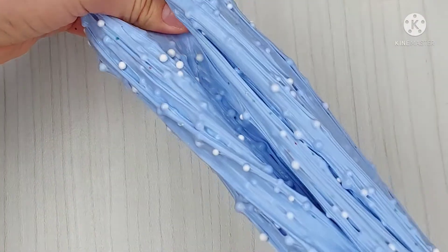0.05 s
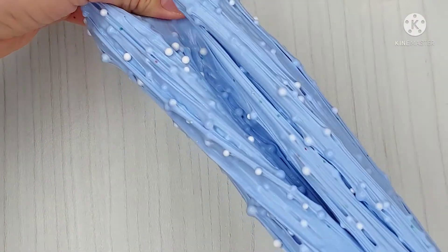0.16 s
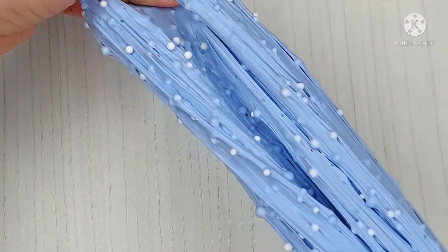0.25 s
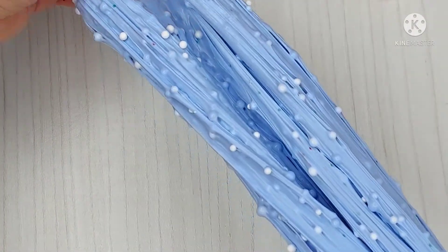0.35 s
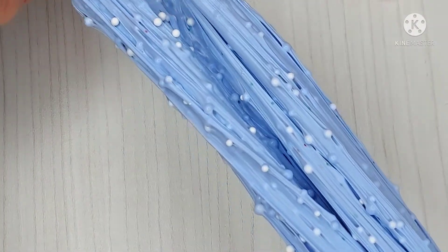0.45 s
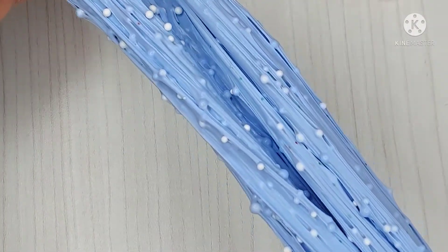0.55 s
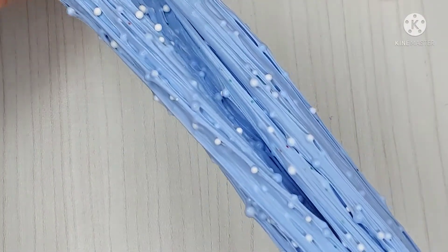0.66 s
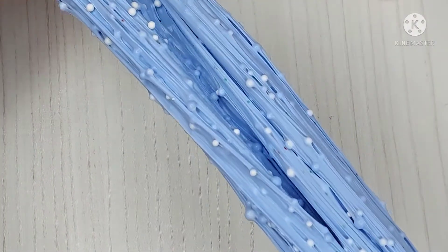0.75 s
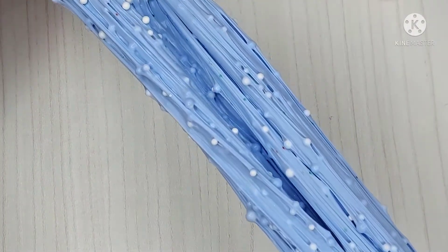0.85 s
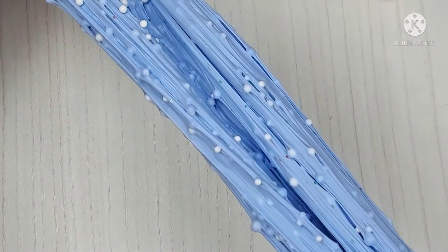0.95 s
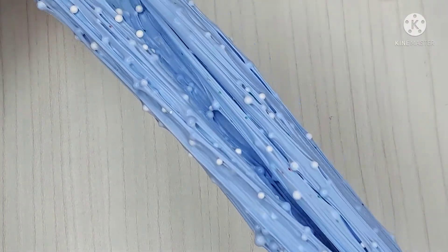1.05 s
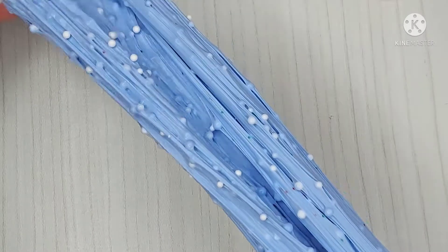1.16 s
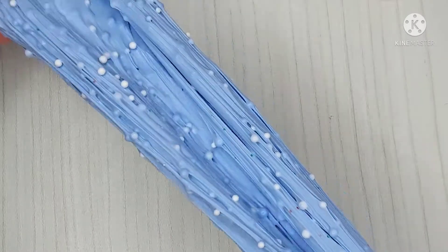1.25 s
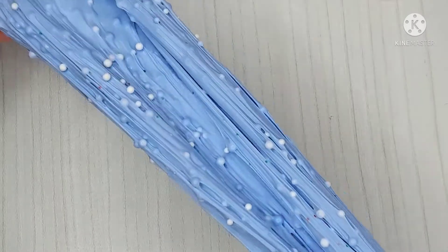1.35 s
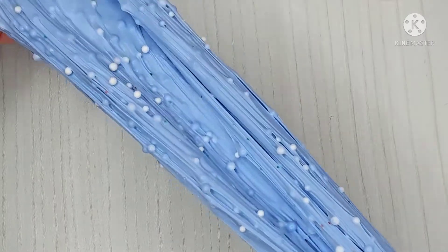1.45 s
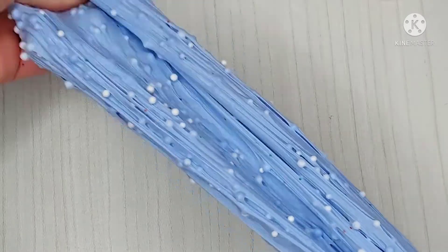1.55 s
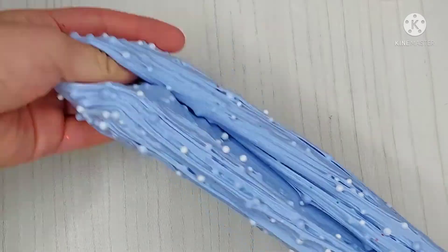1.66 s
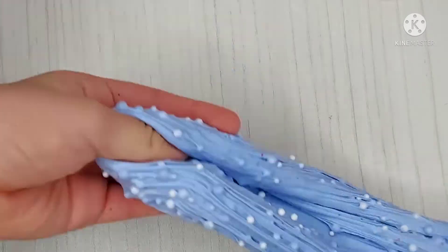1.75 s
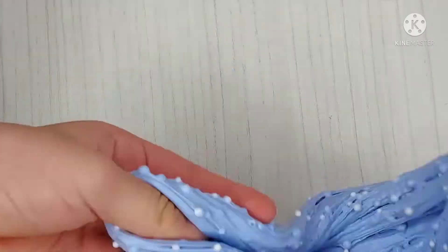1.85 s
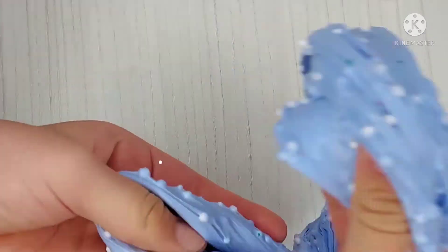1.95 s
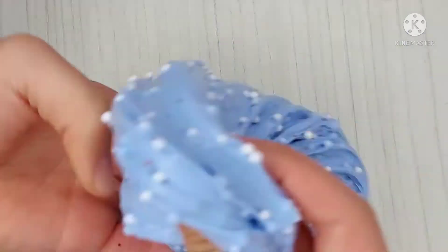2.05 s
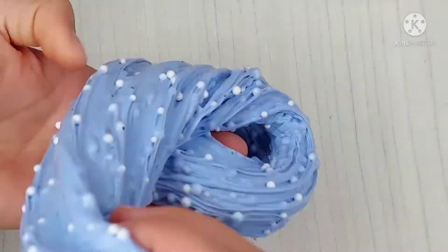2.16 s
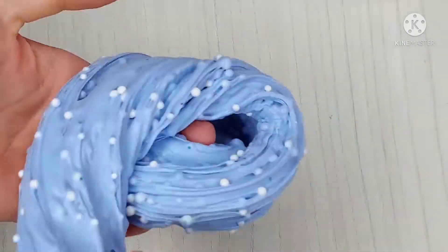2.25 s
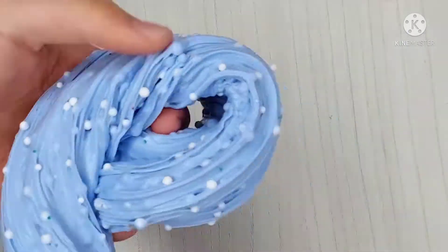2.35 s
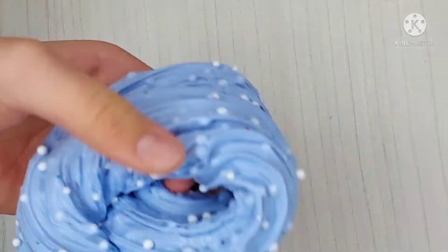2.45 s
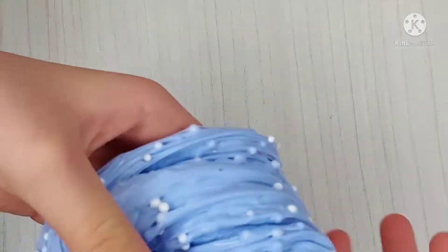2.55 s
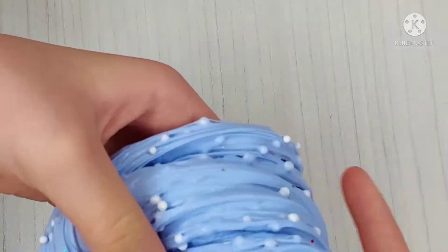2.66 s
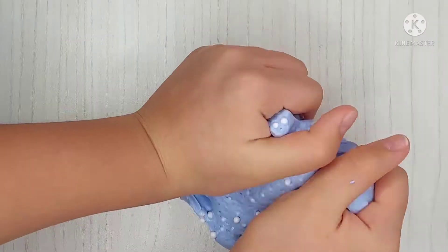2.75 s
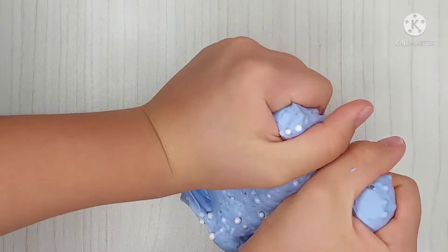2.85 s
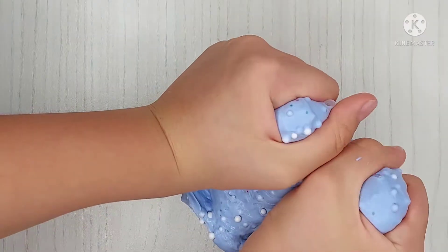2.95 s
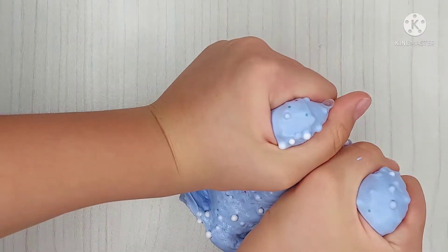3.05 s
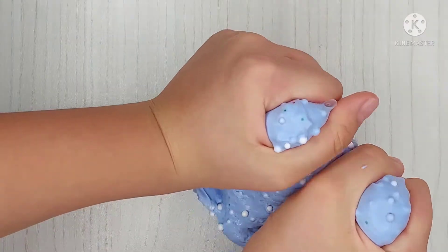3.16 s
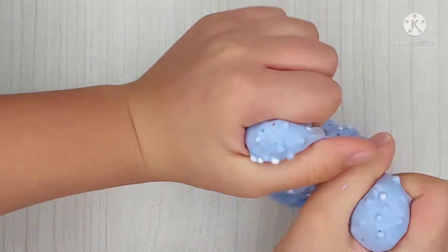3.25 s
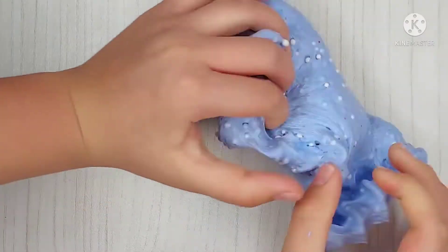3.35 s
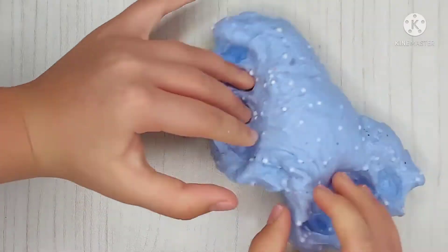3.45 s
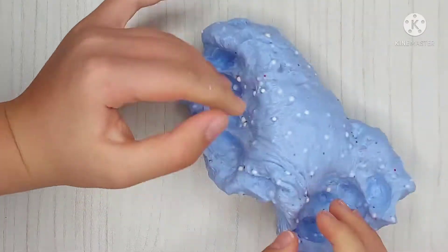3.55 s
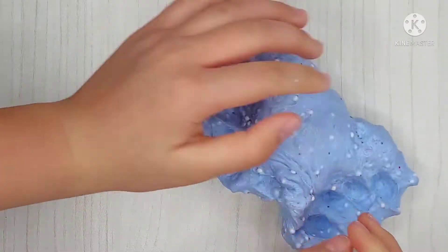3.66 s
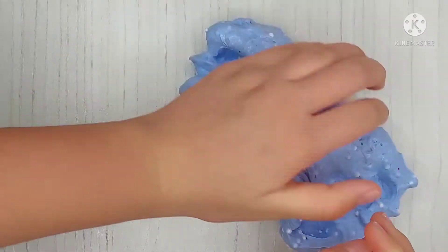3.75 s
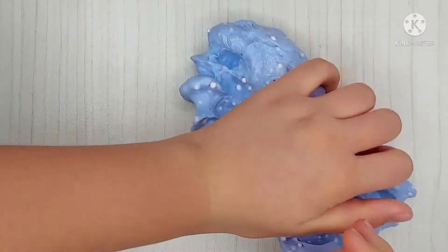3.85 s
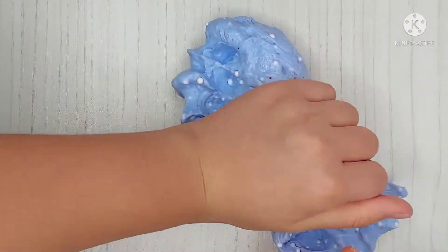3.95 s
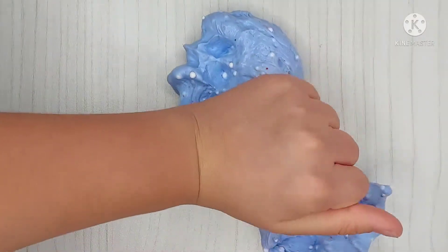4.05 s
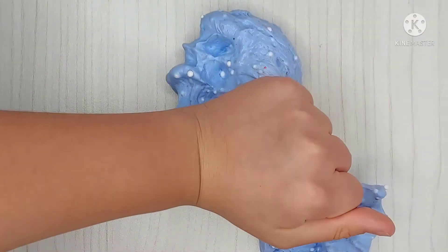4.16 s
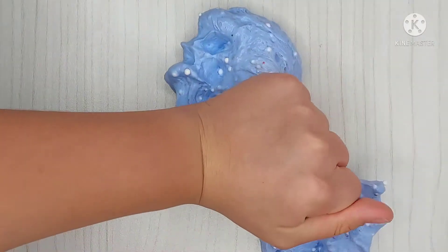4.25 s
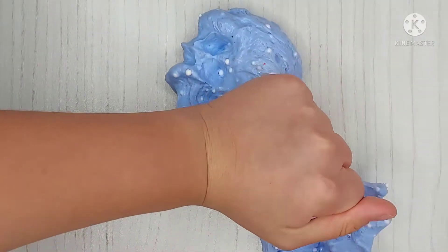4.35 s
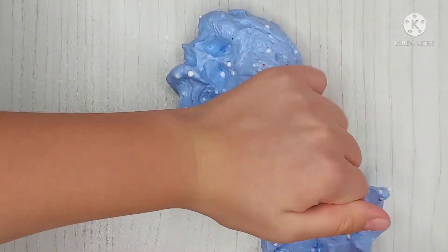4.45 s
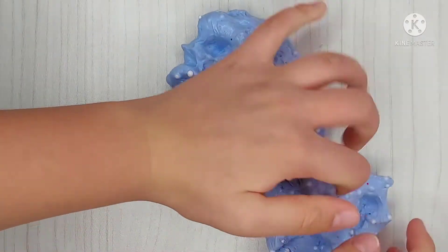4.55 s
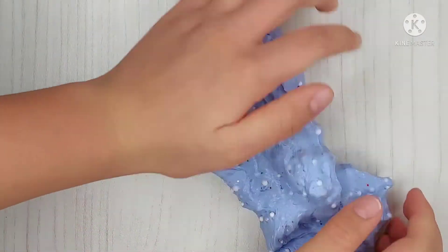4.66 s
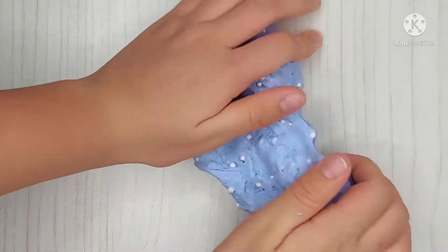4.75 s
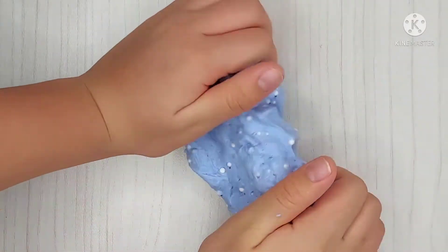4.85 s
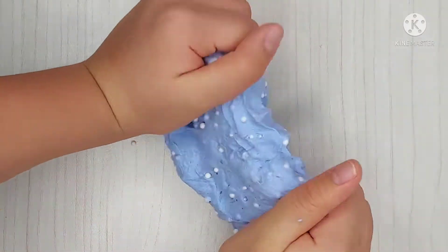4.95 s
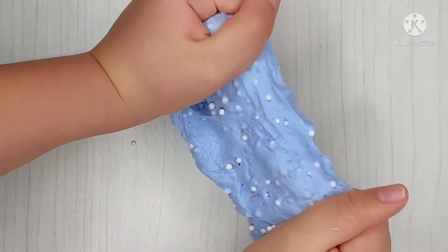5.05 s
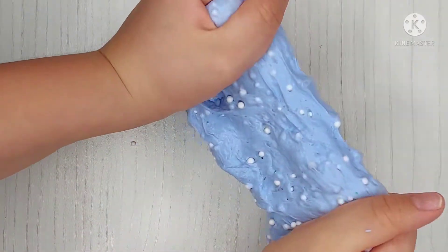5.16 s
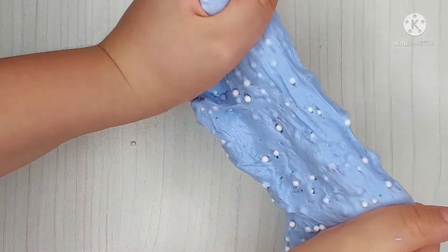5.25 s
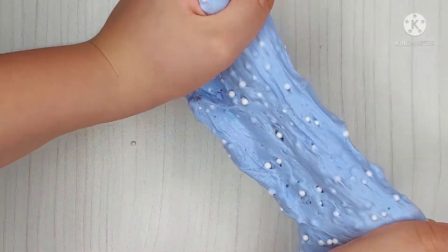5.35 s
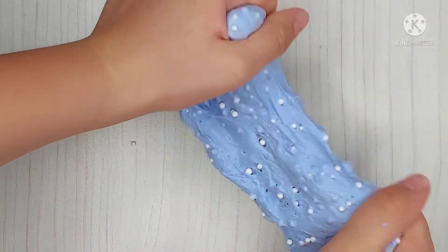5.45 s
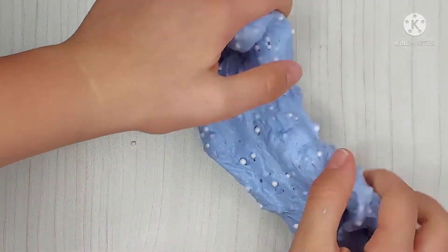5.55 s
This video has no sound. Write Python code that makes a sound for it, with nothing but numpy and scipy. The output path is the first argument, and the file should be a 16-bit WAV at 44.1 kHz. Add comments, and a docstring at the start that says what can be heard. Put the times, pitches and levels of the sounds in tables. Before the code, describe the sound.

A quiet room with a barely audible low hum; the microphone is very close. From 0 to 1 s, stretching slime gives small, irregular dry ticks over a faint sticky fizz, thinning out until about 2 s. Folding adds soft wet peels and a couple of clearer clicks near 2.5 s. At about 2.9 s a squeeze bursts air pockets in a dense, very loud volley of sharp snaps, crunching until roughly 3.16 s. Fewer, weaker pops and a sticky fizz follow around 3.3 to 3.6 s, with soft hand bumps on the table. It is nearly silent until 3.9 s. Pressing builds from 4.1 s into a second loud crunch at 4.2 to 4.45 s, mixing deep, hollow pops and bright snaps. Small crackles fade, and a dull table thump lands at 4.8 s. From 5.05 to 5.4 s a third, crisp, rapid burst crunches, then drops to light, sticky crackle by 5.5 s.

```python
"""Squeezing airy slime on a tabletop

Hands stretch, then squeeze slime full of air pockets and foam beads, heard from close by.
Pockets burst as sharp filtered clicks that bounce off the table and end in a noisy sputter.
Wet skin makes a sticky fizz of tiny decaying tones over hiss; hands bump and drag on the table, which
rings as a set of fading sines. A quiet room adds its echo, and shaped noise hums underneath."""
import sys
import numpy as np
from scipy import signal
from scipy.fft import rfft, irfft
from scipy.io import wavfile
from scipy.ndimage import uniform_filter1d

SR = 44100
rng = np.random.default_rng(int(sys.argv[2]) if len(sys.argv) > 2 else 0)


def transcribe(u):
    """Save the signal u as a 16-bit wav file named by the first command-line argument.

    u: samples, shape (n,) or (channels, n), limited to [-1, 1]; the rate is SR.
    q: integer samples, one column per channel.
    """
    v = np.clip(np.atleast_2d(u).T, -1, 1)
    q = np.round(v * 32767).astype(np.int16)
    wavfile.write(sys.argv[1], SR, q)


N = 246519  # length in samples


def gain_of(db):
    """Turn decibels into a plain multiplier."""
    return 10 ** (np.asarray(db) / 20)


def evened(x):
    """Scale a sound to an average (RMS) level of one."""
    return x / np.sqrt(np.mean(x ** 2, -1, keepdims=True) + 1e-20)


def read(points, hz):
    """Read a curve of (f/Hz, value) points, with pitch spaced by ratio as the ear hears it."""
    f, value = np.transpose(points)
    return np.interp(np.log(hz + 1), np.log(f + 1), value)


def add(mix, s, sound):
    """Mix a sound in at s seconds, cutting it off at the end of the mix."""
    part = mix[round(s * SR):][:len(sound)]
    part += sound[:len(part)]


def swell(start, hold, first_db, last_db, rise, fall):
    """Gain of one gesture: rises, slides between two levels while held, falls; slopes in dB a second."""
    t = np.arange(N) / SR - start
    held_db = np.interp(t, [0, hold], [first_db, last_db])
    return gain_of(held_db + rise * np.minimum(t, 0) - fall * np.maximum(t - hold, 0))


def shaped_noise(db, size, patchy_db):
    """Noise from random short-time spectra under a dB field (pitch x time), with drifting patches."""
    a, b, patches = rng.standard_normal((db.shape[1], db.shape[0], 3)).T
    patches = uniform_filter1d(uniform_filter1d(patches, 5, 0), 6, 1)
    spectra = (a + 1j * b) * gain_of(db + patchy_db * patches / patches.std())
    return signal.istft(spectra, nperseg=size, noverlap=size * 3 // 4)[1][:N]


# Colour of the background noise: (f/Hz, relative level/dB per Hz)
HUM_COLOUR = [(12, -55.5), (20, -23), (65, -5.5), (114, -10), (174, -20.5), (218, -23), (251, -22.5),
              (440, -28), (492, -36), (551, -36), (888, -42), (12800, -47), (16500, -65)]
# A low hum comes and goes: (start t/s, hold t/s, level/dB)
DRONE = [(1.067, 0.19, -68.5), (2.416, 0.19, -69), (5.41, 0.11, -65)]
HUM_DB = -66
DRONE_HZ, DRONE_FADE_DB_PER_S = 121, 239.5


def hum():
    """Noise makes the low rumble of the house and faint microphone hiss; a sine makes the passing hum."""
    hz, t = np.fft.rfftfreq(2048, 1 / SR), np.arange(N) / SR
    colour = read(HUM_COLOUR, hz)[:, None] * np.ones(N // 512 + 5)
    rumble = shaped_noise(colour, size=2048, patchy_db=0.0)
    drone_level = sum(swell(s, hold, db, db, DRONE_FADE_DB_PER_S, DRONE_FADE_DB_PER_S)
                      for s, hold, db in DRONE)
    drone = drone_level * np.sin(2 * np.pi * DRONE_HZ * t)
    return gain_of(HUM_DB) * evened(rumble) + drone


# The faint crackle of slime under tension: (t/s, level/dB)
STRETCH = [(0, -74), (.5, -74), (1, -77), (1.25, -76.5), (1.5, -80.5), (1.9, -73), (2.25, -74.5),
           (2.6, -76.5), (2.83, -73.5), (3.65, -71), (3.72, -94), (3.85, -78.5), (4.049, -70), (4.62, -76),
           (4.69, -90), (4.82, -70.5), (5.59, -74)]
STRETCH_DULL_DB = 3.5  # lift of its lows
# Wet skin presses in or peels off:
# (start t/s, hold t/s, fizz level at start/dB, fizz level at end/dB, lift of its lows/dB,
#  level of the drag on the table/dB)
PEELS = [(1.67, 0.21, -67.5, -78, -2, -100), (2.045, 0.019, -72.5, -65.5, 12.5, -100),
         (2.08, .015, -60, -61.5, -13, -100), (2.297, 0.011, -64, -64, -1.5, -100),
         (2.485, 0.043, -64.5, -71, -2, -100), (2.909, .19, -48.5, -63, 4.5, -93),
         (3.266, 0.17, -49, -51, -0.5, -67.5), (3.474, 0.032, -65, -69, 7.5, -100),
         (3.528, 0.065, -62.5, -69.5, 2.5, -78), (3.949, 0.076, -61.5, -68, 0.5, -98),
         (4.098, .03, -63.5, -59, 7.5, -67), (4.202, 0.19, -53.5, -55.5, 5.5, -81),
         (4.298, 0.037, -51, -43.5, -15, -100), (4.528, 0.11, -48.5, -57, 1.5, -63.5),
         (4.912, 0.2, -55.5, -58.5, 6.5, -67), (5.168, 0.16, -56, -60, 4.5, -93.5),
         (5.348, 0.063, -47, -58.5, -1.5, -77), (5.529, 0.05, -55.5, -51, -0.5, -77)]
RISE_DB_PER_S, FALL_DB_PER_S = 401, 599.5


def wetness():
    """Level of the fizz, whole and in its lows: the stretch and every peel add up in power."""
    parts = [gain_of(np.interp(np.arange(N) / SR, *np.transpose(STRETCH)))]
    parts += [swell(*row[:4], RISE_DB_PER_S, FALL_DB_PER_S) for row in PEELS]
    dull = gain_of([STRETCH_DULL_DB] + [row[4] for row in PEELS])[:, None]
    return np.linalg.norm(parts, axis=0), np.linalg.norm(parts * dull, axis=0)


# Colour of the fizz: (f/Hz, relative level/dB per Hz)
FIZZ_COLOUR = [(250, -16), (500, -2.5), (1000, 1), (2000, -1.5), (4000, -0.5), (7000, -2.5), (11000, -6),
               (14000, -15), (16000, -20.5)]


def fizz(level, lows_level):
    """Countless tiny threads and bubbles snap: clumped grains of many pitches over a lumpy hiss."""
    grains = np.zeros(N)
    snaps = rng.random(N) < 1800 / SR  # about 1800 a second
    size = gain_of(2.23 * np.minimum(rng.exponential(1, N), 5)) * snaps
    kinds = np.geomspace(500, 15000, num=24)  # grain pitches in Hz
    kind, t = rng.integers(0, len(kinds), N), np.arange(400) / SR
    for k, hz in enumerate(kinds):
        grain = np.sin(2 * np.pi * hz * t) * np.exp(-t * hz / 5.5)
        grain *= gain_of(read(FIZZ_COLOUR, hz)) * np.sqrt(hz) / np.linalg.norm(grain)
        grains += signal.oaconvolve(size * (kind == k), grain)[:N]
    hz = np.fft.rfftfreq(256, 1 / SR)
    colour = read(FIZZ_COLOUR, hz)[:, None] * np.ones(N // 64 + 5)
    hiss = shaped_noise(colour, size=256, patchy_db=4.0)
    # threads let go in bunches, so the level wanders
    clumps = evened(uniform_filter1d(uniform_filter1d(rng.standard_normal(N), 300), 300))
    both = evened((0.72 * evened(grains) + 0.66 * evened(hiss)) * gain_of(2.2 * clumps))
    lows = signal.lfilter(*signal.butter(2, 3000, fs=SR), both)
    return level * (both - lows) + lows_level * lows


# Hands on the table: (t/s, peak level/dB, softness/ms)
BUMPS = [(2.979, -53, 1.6), (3.467, -45, 1.4), (3.52, -52, 1.9), (3.571, -53, 1.7), (3.909, -57.5, 1.25),
         (4.546, -49, 1.4), (4.6, -54, 0.8), (4.745, -51.5, 1.2), (4.794, -33, 0.56), (4.847, -53, 1.14),
         (4.935, -47, 1.1), (4.978, -47, 0.94)]
# Tones the tabletop rings at: (f/Hz, relative level/dB, time to fade by 60 dB/s)
TABLE_MODES = [(54, 2, .16), (81, -2, .13), (118, -7, .1), (226, -1, .12), (285, -3, .06), (400, -8, .04),
               (490, -3, .04), (715, -8, .03)]
DRAG_RISE_DB_PER_S, DRAG_FALL_DB_PER_S = 110.5, 91.5


def tabletop(slime):
    """Soft pushes, dragging and the slime's own sound ring the tabletop's low tones."""
    t, push = np.arange(SR // 4) / SR, np.zeros(N)
    # the board takes about a cycle to swing up
    ring = sum(gain_of(db - 60 * t / t60) * np.sin(2 * np.pi * hz * t) * np.tanh(1.3 * hz * t)
               for hz, db, t60 in TABLE_MODES)
    for s, db, soft in BUMPS:
        press = np.exp(-((1000 * t[:900] - 2 * soft) / soft) ** 2)
        blow = np.convolve(ring, press)
        add(push, s, -gain_of(db) * blow / abs(blow).max())
    rub = evened(signal.oaconvolve(np.diff(rng.standard_normal(N + 1)), ring)[:N])
    drag = rub * sum(swell(s, hold, db, db, DRAG_RISE_DB_PER_S, DRAG_FALL_DB_PER_S)
                     for s, hold, *_, db in PEELS)
    shaken = signal.oaconvolve(np.diff(slime, prepend=0), ring)[:N]
    return push + drag + gain_of(-14.5) * shaken


# How long the room's echo lasts: (f/Hz, time to fade by 60 dB/s)
ROOM_FADE = [(500, 0.2), (2000, 0.14), (6000, 0.15), (14000, 0.11)]


def room(x):
    """Room echo: sparse taps of random sign after 3 ms, each band dying at its own speed."""
    taps = np.zeros(SR // 4)
    at = np.arange(130, len(taps) - 20, 20)
    taps[at + rng.integers(0, 20, len(at))] = rng.choice([-1., 1.], len(at))
    hz, t, spectra = signal.stft(taps, SR, nperseg=256)
    fade = gain_of(-60 * t / read(ROOM_FADE, hz)[:, None])
    tail = signal.istft(spectra * fade, SR, nperseg=256)[1]
    return signal.fftconvolve(x, tail / np.linalg.norm(tail))[:N]


def causal(db):
    """Spectra that put the sound as early as it can be (minimum phase), from rows of gains in dB."""
    log_gain = np.log(gain_of(np.maximum(db, -100)))
    circle = np.concatenate([log_gain, log_gain[..., -2:0:-1]], -1)
    return np.exp(signal.hilbert(circle).conj()[..., :db.shape[-1]])


LOWS_DB, HIGHS_DB = -2.5, -2.225
LOWS_PER_DULL_DB, HIGHS_PER_DULL_DB = 0.4, -0.534  # dullness raises the lows and lowers the highs
# the higher a pocket's pitch, the more its own tone stands out
LOWS_DB_PER_OCTAVE, HIGHS_DB_PER_OCTAVE = -2.5, -3.115
BOUNCE_MS, BOUNCE_SPREAD_MS, BOUNCE_DB, BOUNCE_SPREAD_DB = 0.878, 0.11, -13, 2


def bursts(rows):
    """Each burst: a click, its bounce off the table, and a sputter as the pocket's walls collapse."""
    _, peak_db, pocket_hz, dull_db, sputter_db, tone_db = rows.T[:, :, None]
    octave = np.log2(pocket_hz / 4000)
    low_db = LOWS_DB + LOWS_PER_DULL_DB * dull_db + LOWS_DB_PER_OCTAVE * octave - tone_db
    high_db = HIGHS_DB + HIGHS_PER_DULL_DB * dull_db + HIGHS_DB_PER_OCTAVE * octave - 0.89 * tone_db
    # the bounce's delay and level vary at random from burst to burst
    vary = rng.standard_normal((len(rows), 2)).T[:, :, None]
    delay_ms = BOUNCE_MS + BOUNCE_SPREAD_MS * vary[0]
    bounce_db = np.minimum(BOUNCE_DB + BOUNCE_SPREAD_DB * vary[1], -2)
    size = 2048
    hz, t = np.fft.rfftfreq(size, 1 / SR) + 1, np.arange(size) / SR
    tilt_db = low_db / (1 + (hz / 2500) ** 4) + high_db / (1 + (9000 / hz) ** 4)
    tilt_db -= 24 / (1 + (hz / 300) ** 2)
    # faint, far pockets lose their top
    tilt_db += (.25 * peak_db - 3) / (1 + (13000 / hz) ** 8) - 50 / (1 + (18500 / hz) ** 20)
    # the pocket's own resonance
    near = 1 / (1 + ((hz - pocket_hz) / (250 + 0.14 * pocket_hz)) ** 2)
    push_pull = (1j * hz - 4000) / (1j * hz + 4000)  # a push, then a pull
    click = causal(tilt_db + 7.0 * near) * push_pull
    click /= abs(signal.hilbert(irfft(click))).max(1, keepdims=True)
    late = np.exp(-2j * np.pi * hz * delay_ms / 1000)
    echoes = 1 + gain_of(bounce_db) * late + gain_of(bounce_db - 9) * late ** 2
    click_sound = irfft(click * echoes) * (1 - t / t[-1]) ** 2
    lumps = rng.standard_normal((len(rows), size)) * gain_of(2.5 * rng.standard_normal((len(rows), size)))
    rattle = evened(irfft(rfft(lumps) * click * gain_of(3.6 * near)))
    # the sputter dies quickly at first, then slowly
    fade = gain_of(-60 * t / 0.011) + gain_of(-11.5 - 60 * t / 0.054)
    fade = np.clip(t / 0.0015, 0, 1) ** 2 * fade * (1 - t / t[-1])
    return gain_of(peak_db) * (click_sound + gain_of(sputter_db + 5.5) * rattle * fade)


SMALL_POPS = 45  # how many
SMALL_DB, SMALL_SPREAD_DB = -59, 8  # lowest peak where the fizz is at its middle level; range above it
SMALL_FOLLOW = 0.95  # share of the fizz's rise and fall, in dB, that the peak follows
SMALL_DULL_DB, SMALL_SPUTTER_DB = 9, -13


def small_pops(level):
    """Rows for lesser pockets: any moment, many sizes, louder where the fizz is."""
    when, pitch, big, dull, tone = rng.random((SMALL_POPS, 5)).T
    at = (when * (N - 1)).astype(int)
    fizz_db = 20 * np.log10(level[at] / np.median(level))
    peak_db = SMALL_DB + SMALL_FOLLOW * fizz_db + SMALL_SPREAD_DB * big
    pocket_hz, dull_db = 1500 * 6.5 ** pitch, SMALL_DULL_DB + 16 * (dull - .5)
    return np.transpose([at / SR, peak_db, pocket_hz, dull_db, SMALL_SPUTTER_DB + 0 * at, 8 * tone])


# The clearest bursting pockets:
# (t/s, peak level/dB, pocket pitch f/Hz, dullness/dB, sputter level before a shared lift/dB,
#  own tone over lows and highs/dB)
CLEAR_POPS = [(.067, -42, 2020, 2, -11.5, -1), (.106, -45, 2000, 3, -18, 2), (.1289, -47, 2900, 7, -18, 2),
              (.1421, -38.5, 9900, 1, -23, -5), (.1538, -43, 9050, 0, -19, -10),
              (.2123, -35.5, 6100, -15, -23, -3), (.2372, -34, 5700, -7, -22, -8),
              (.2472, -47, 6400, -7, -29, 0), (.2694, -45, 1320, 34, -9, 2), (.301, -53, 5600, 15, -23, 1),
              (.311, -46, 2310, 14, -20, 5), (.3414, -42.5, 1240, 15, -16, 5),
              (.355, -34, 8900, 5, -18, -1), (.3814, -45, 2320, 2, -15, 14),
              (.427, -43.5, 2500, 1, -14.5, -3), (.4455, -41, 4500, -3, -16, -2),
              (.4722, -42.5, 3500, 3, -29, 1), (.497, -45, 4000, 10, -16, 9),
              (.6163, -40.5, 5640, 2, -20, 13), (.6415, -50, 2610, 3, -11, 4),
              (.6561, -43, 7100, 16, -16, 3), (.731, -47, 1600, 5, -14, -1),
              (.7782, -41.5, 10200, 3, -33, 1), (.812, -47.5, 3000, 8, -13, -1),
              (.8271, -41, 8000, 4, -22, -3), (.922, -45.5, 8800, -14, -32, -4),
              (.9845, -50.5, 5900, 16, -20, -4), (1.064, -50.5, 3900, 17, -9.5, 10),
              (1.1936, -56, 5200, 0, -13, 10), (1.2316, -48, 2640, 15, -17, 9),
              (1.3188, -49, 3340, 0, -16.5, 3), (1.376, -54, 2500, -2, -16, -5),
              (1.5908, -50.5, 7900, -20, -9, -2), (1.6102, -43, 5930, -14, -18, 3),
              (1.799, -51.5, 3920, 16, -9, 1), (1.815, -48.5, 2960, 14, -9.5, -1),
              (1.852, -55, 1920, 20, -8, 8), (1.876, -41.5, 6130, -5, -18, -5),
              (1.975, -52, 6500, 6, -13, 6), (2.0342, -47, 2000, 23, -9, 5),
              (2.0499, -38.5, 2800, 26, -18, 4), (2.0545, -44, 1510, 25, -3, 9),
              (2.1272, -42, 1890, 21, -12.5, 1), (2.2902, -50, 4970, 8, -15, 7),
              (2.3197, -40.5, 3950, -1, -9, 0), (2.4258, -48.5, 8500, 4, -8, 0),
              (2.4674, -30, 6950, -6, -15, 3), (2.477, -27.5, 5400, -9, -13, 2),
              (2.5175, -42, 8600, 5, -10, -4), (2.5558, -54, 2110, 13, -11, 10),
              (2.5907, -56.5, 1800, 4, -7, -4), (2.7017, -45.5, 6900, -7, -12, 7),
              (2.756, -54.5, 980, 38, -3, -2), (2.8502, -43, 4400, -6, -10, -3.5),
              (2.8611, -13, 8500, -15, -29, 6), (2.8704, -27, 5200, 2, -19, -7),
              (2.8789, -23.5, 5000, -9, -13, 0), (2.8842, -18, 8500, -19.5, -19, 4),
              (2.9046, -24, 5800, -16, -32, 8), (2.91, -21, 5130, -7, -19, -7.5),
              (2.921, -18, 5700, 10, -18, 7), (2.926, 0.5, 8700, -7.5, -54, -7),
              (2.935, -1, 4940, 15, -16, -2.5), (2.9405, 4.5, 5160, -15.5, -36, 1),
              (2.959, -15, 4160, -21, -14.5, 1), (2.9609, -9, 3630, 11, -35, -8.5),
              (2.9672, -1.9, 11800, 8, -18.5, -5), (2.9765, -22, 7400, -10, -17, 2.5),
              (2.9797, 6.5, 11500, -18, -38, -10), (2.994, -28.5, 10620, -17.5, -26, 0),
              (3.0088, -25, 11110, 3, -15, -9), (3.0167, -6.5, 8380, -23, -21, 0),
              (3.019, -15, 7300, 10.5, -15, -3), (3.0401, -20.5, 11600, -11, -15, -1),
              (3.0445, 0, 4360, -1, -24.5, -4.5), (3.0544, -24, 8330, -20, -10, -3),
              (3.0603, -6.5, 6460, 3, -22.5, 3), (3.0689, -14, 8700, -13, -38, -2),
              (3.084, -29, 3980, -8, -32, -4), (3.1091, -17, 10000, -2.5, -13, -7),
              (3.132, -39, 9100, -9, -30, -5.5), (3.142, -20.5, 6000, -14, -33, -1),
              (3.1466, -7, 10900, -1.5, -21.5, 3), (3.1583, -22, 8900, -4, -38.5, -2),
              (3.2567, -30, 7950, -9, -20, 13), (3.3058, -31, 3230, 5, -11, 9),
              (3.4226, -24.5, 3780, 7, -38, 8), (3.4337, -37, 3660, 11.5, -39, 2.5),
              (3.523, -37.5, 2690, -2, -16, 1), (3.5422, -39.5, 3800, 4, -10.5, -4.5),
              (3.579, -43, 8850, 5, -20.5, 0), (3.6023, -51.5, 1357, 6, -8.5, -0.5),
              (3.9472, -47, 10600, 4, -12, -5), (3.9583, -43.5, 2200, 15.5, -11.5, 0),
              (4.013, -47, 2700, 29, -11, 1), (4.0792, -47.5, 1700, 24, -29, -2),
              (4.0967, -40.5, 1100, 13, -20, -3), (4.105, -35, 5100, 18, -18, 9),
              (4.1102, -32.5, 9200, -0.5, -19, -7.5), (4.1189, -21, 7600, -5, -32.5, -9.5),
              (4.1324, -32, 1800, 10.5, -17.5, 7.5), (4.1419, -30, 6700, 4.5, -18, -0.5),
              (4.152, -34, 9800, -8.5, -32, -6), (4.1744, -15.5, 1900, 15, -21.5, 4),
              (4.1974, -8, 1530, 16, -20.5, -0.5), (4.2163, -28, 2100, -9, -19.5, -1),
              (4.235, -18, 8200, -6.5, -23.5, -3), (4.248, -13.5, 12900, -16.5, -38, -15.5),
              (4.265, 1, 1390, -1, -26.5, 0.5), (4.2781, -5, 6640, -5.5, -4, 8),
              (4.3012, -16, 6500, -18.5, -11, 2.5), (4.3256, 2.5, 14200, -9, -29.5, -6.5),
              (4.3462, -3.5, 14100, -13.5, -20, -1), (4.3556, -13, 1730, 2, -13.5, 0),
              (4.357, -14.5, 1500, 25.5, -17.5, -3.5), (4.381, -11.5, 9600, -13, -30, -6),
              (4.447, -19, 1920, -1.5, -23, -5.5), (4.5117, -37, 6100, 7, -14, -6.5),
              (4.5327, -40, 1720, 17, -8, 0), (4.5388, -34, 1690, 25, -13, -3.5),
              (4.558, -30, 4650, 20.5, -14, -10.5), (4.5846, -29, 4640, 3, -15, -7.5),
              (4.635, -32.5, 2550, 26, -16.5, 9), (4.8762, -37.5, 10440, 4, -23, -11),
              (4.9119, -32, 2100, 19, -18, -2), (4.9673, -25.5, 1650, 11, -16, 2.5),
              (4.9724, -22.5, 13300, -12, -20, -14), (5.0161, -22, 2760, 14, -9, 5),
              (5.0533, -25.5, 7400, -14, -22, -1), (5.0726, -26, 1100, 36, -4.5, -3),
              (5.0857, -14.5, 11900, -6, -23, 2), (5.0937, 1, 11800, -7.5, -27, 5),
              (5.125, -20.5, 7500, -8, -37, -6), (5.1464, -36.5, 1490, 18, -27, -7),
              (5.1541, -32, 4800, -20, -11, 5), (5.1605, -24.5, 9700, 2, -18.5, -2),
              (5.1779, -24.5, 6400, 2, -32, -9), (5.19, -34, 2800, -13, -19, -2),
              (5.2011, -7, 12300, -16, -25.5, 1), (5.213, -31, 8600, 8, -3, -6),
              (5.2207, -5, 10000, 9, -20, 2.5), (5.2291, -1, 4880, -9, -40, 2),
              (5.2482, -5, 9900, -26, -21, -5), (5.2496, -0.9, 4600, 0.5, -19, 1),
              (5.2663, -25, 4600, -26, -32, -3), (5.2742, -2, 10200, -18, -17.5, 11),
              (5.2815, -0.3, 8250, -12, -21.5, 1.5), (5.309, -20, 10900, -25.5, -16, -7),
              (5.3272, -0.5, 9470, -4.5, -17, -4.5), (5.3415, -9.5, 9750, -24, -33.5, 2),
              (5.3563, -20, 3620, -12, -11.5, -2), (5.3849, -4, 1287, 4, -20.5, -0.5),
              (5.4018, -19.5, 4990, 11, -16.5, -9), (5.4352, -25, 3600, 6, -25, -4),
              (5.524, -36, 3700, -7, -22, -6), (5.535, -33, 4070, -4, -13, 8),
              (5.5467, -38, 4470, -5, -17, 0)]


def pops(level):
    """The pockets that burst clearly, plus lesser ones at random moments."""
    out, rows = np.zeros(N), np.concatenate([CLEAR_POPS, small_pops(level)])
    for row, sound in zip(rows, bursts(rows)):
        add(out, row[0], sound)
    return out


def scene():
    """Add up the slime, its echo in the room, the tabletop and the hum."""
    level, lows_level = wetness()
    slime = pops(level) + fizz(level, lows_level)
    return (slime + gain_of(-17.5) * room(slime) + tabletop(slime) + hum())[None]


EDGE_HZ = 15800  # the highest pitches let through


def record(dry):
    """The loudest pops bend smoothly against the input's ceiling; then the top treble is cut."""
    held = dry / (1 + abs(dry / .85) ** 6) ** (1 / 6)
    low_pass = signal.firwin(255, EDGE_HZ, window=("kaiser", 9), fs=SR)
    return signal.oaconvolve(held, low_pass[None], "same")


dry = scene()
out = record(dry)
transcribe(out)
```